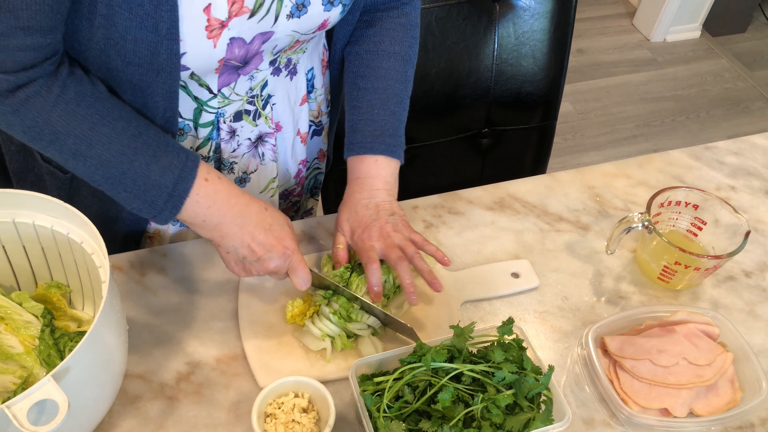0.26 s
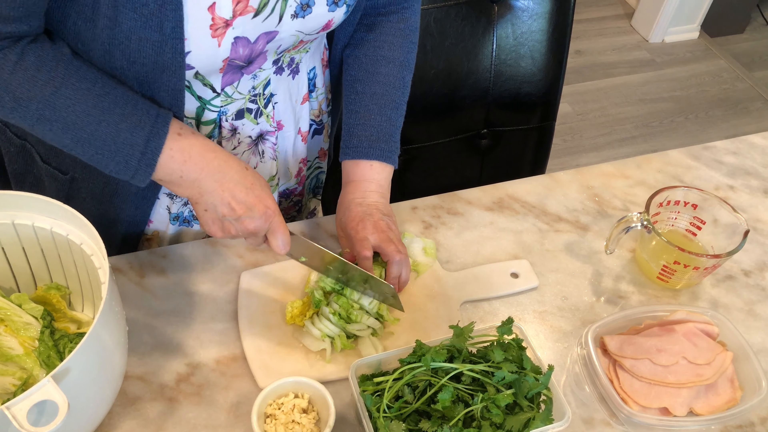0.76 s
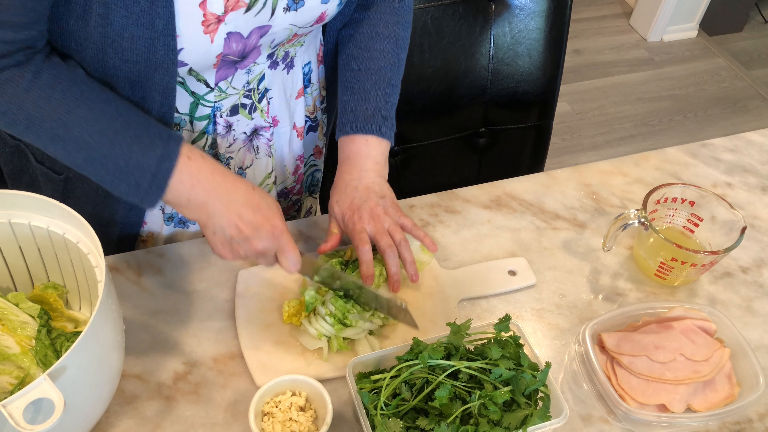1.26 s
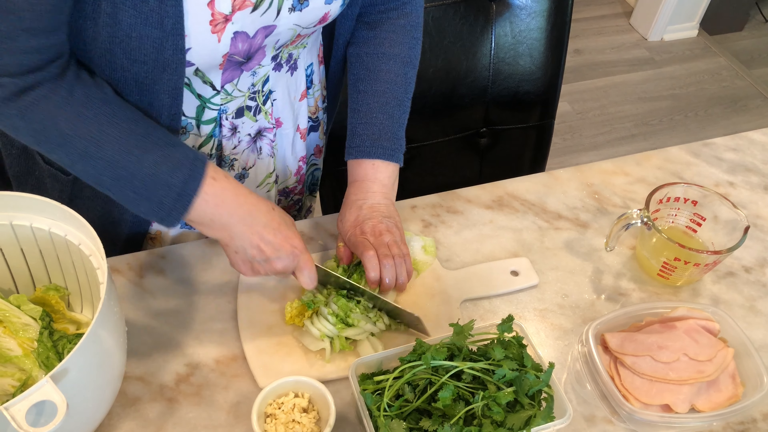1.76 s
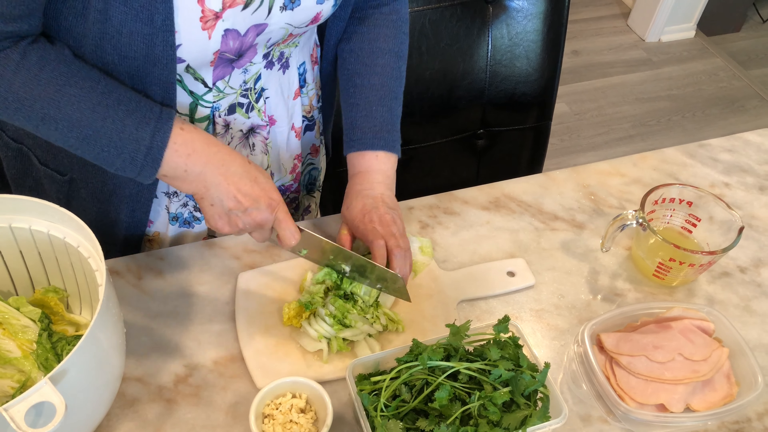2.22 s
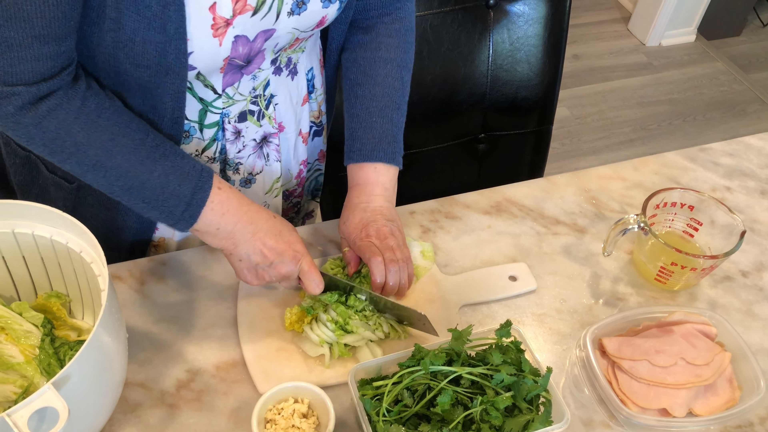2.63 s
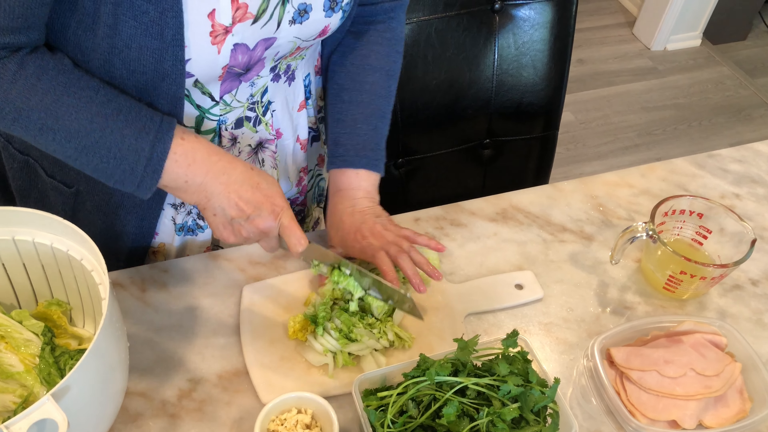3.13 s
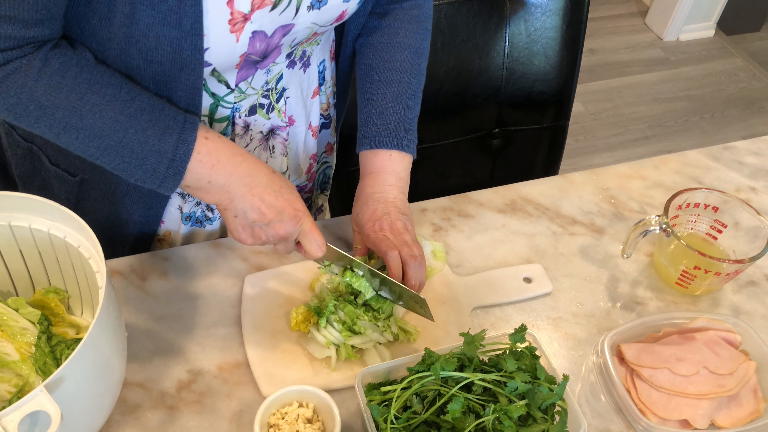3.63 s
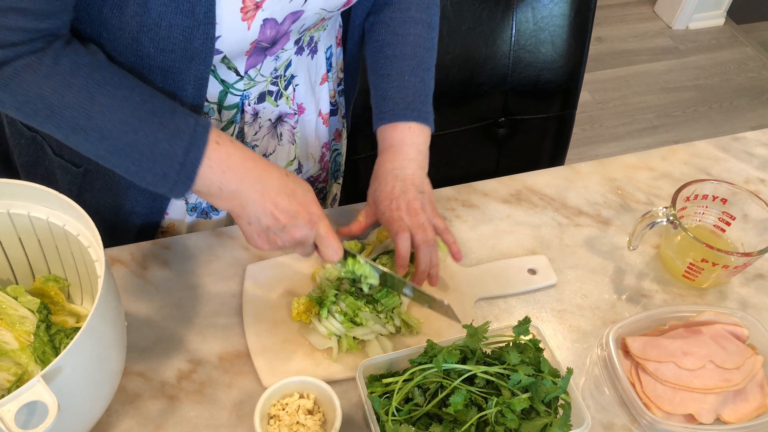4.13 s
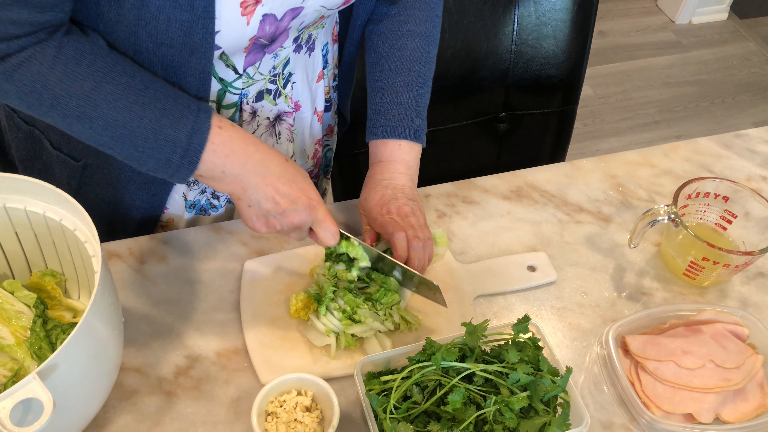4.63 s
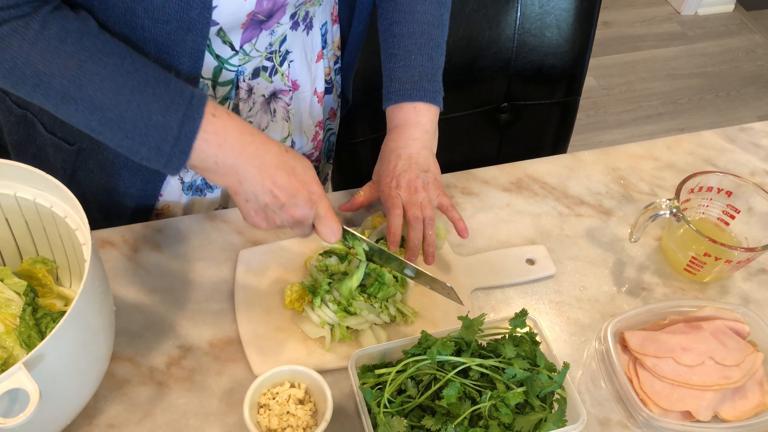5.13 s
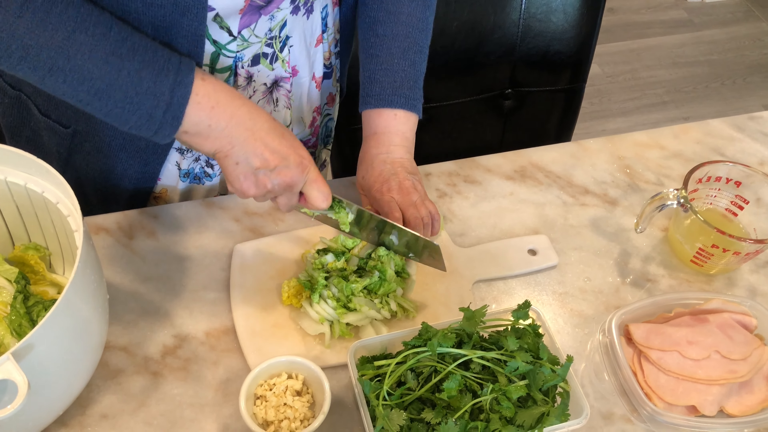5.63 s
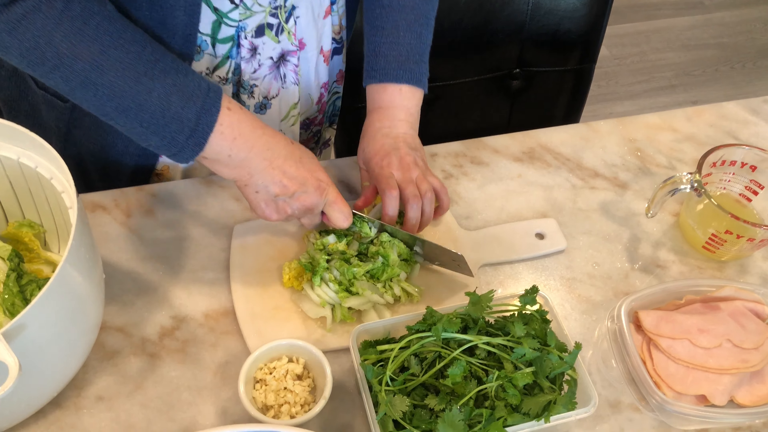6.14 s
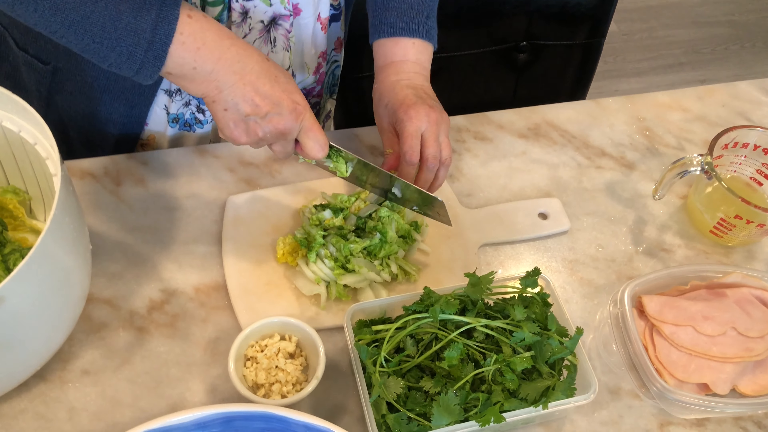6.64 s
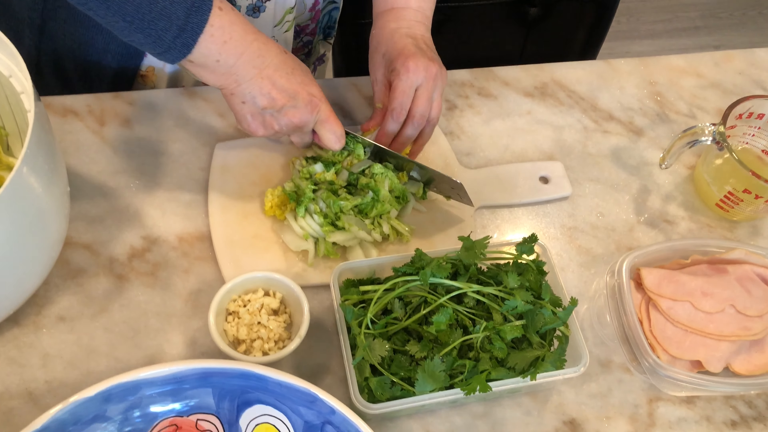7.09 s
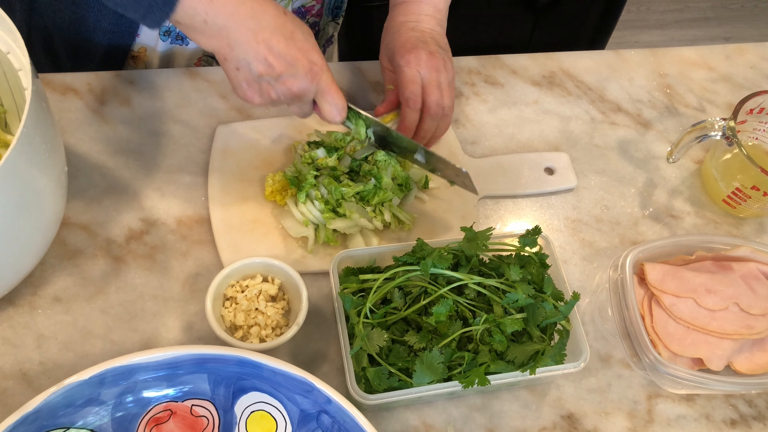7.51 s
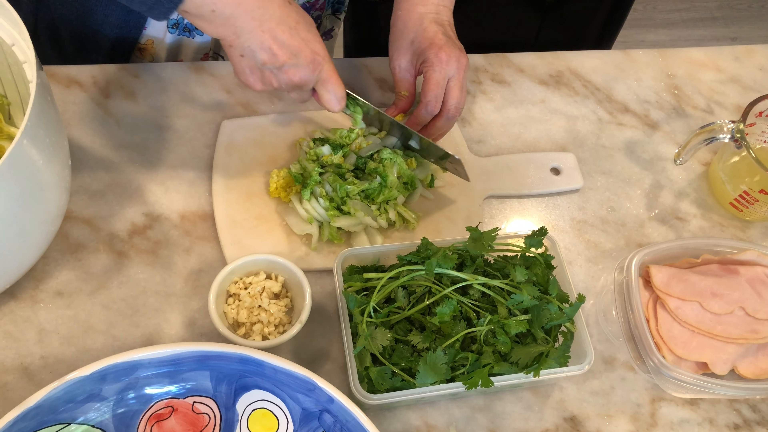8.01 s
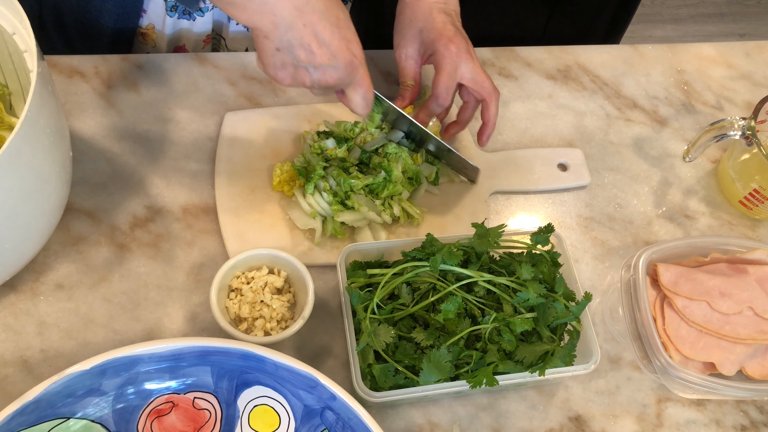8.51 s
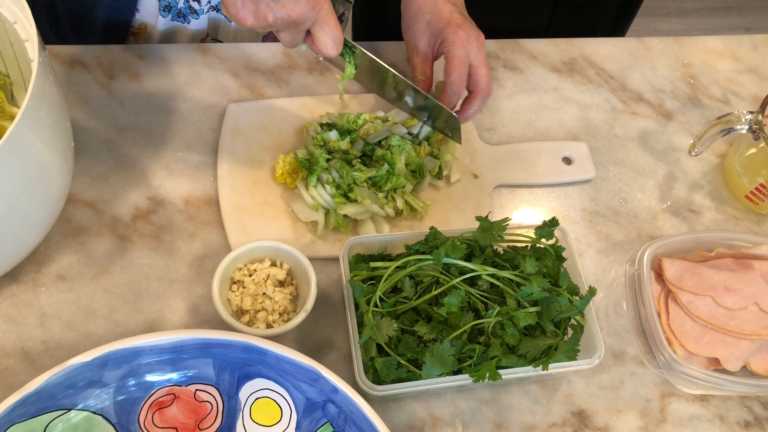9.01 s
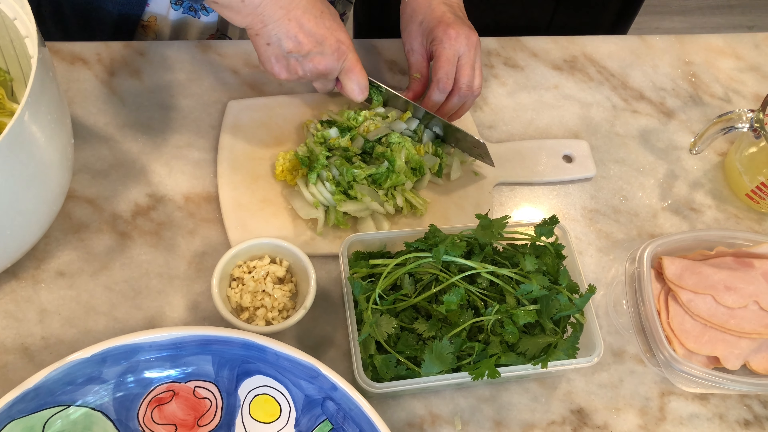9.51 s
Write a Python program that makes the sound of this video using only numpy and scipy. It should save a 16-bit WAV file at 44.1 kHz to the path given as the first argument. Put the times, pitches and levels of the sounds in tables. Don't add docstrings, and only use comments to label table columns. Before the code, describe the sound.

Slow, separate cabbage cuts crackle and snap, then thud on a board over stone, with soft leaf rustles between strokes in a quiet kitchen.

```python
import sys
import numpy as np
from scipy import signal
from scipy.fft import rfft, irfft, next_fast_len
from scipy.io import wavfile

SR = 44100
rng = np.random.default_rng(int(sys.argv[2]) if len(sys.argv) > 2 else 0)


def to_linear_factor(level_db):
    exponent = np.asarray(level_db, float) / 20
    return 10 ** exponent


def generate_wav(signal):
    frames = np.transpose(np.atleast_2d(signal))
    scaled = np.clip(frames, -1, 1) * 32767
    pcm = np.round(scaled).astype(np.int16)
    wavfile.write(sys.argv[1], SR, pcm)


N = 429975

# start_s, peak_db, boom_db, brightness_db, contact_s
KNOCKS = [(0.192, -43.5, -30.5, -2, 0.013), (0.416, -23, -9.5, -3, 0.015), (1.338, -9.5, -18, 4, 0.0024),
          (2.164, -35.5, -33, 2, 0.013), (2.88, -20.5, -32.5, -7, 0.0065), (4.206, -30, -19.5, 1.5, 0.0089),
          (4.224, -39, -35, -2.5, 0.003), (5.152, -19, -12.5, -1.5, 0.0083),
          (6.333, -23.5, -45, -13, 0.011), (7.363, -26, -38, -5, 0.017), (8.494, -36, -36.5, 1.5, 0.015),
          (8.527, -30, -35.5, -2.5, 0.015), (9.727, -43, -30, 7, 0.007)]
# bite_s, through_s, tearing_db, push_db, counter_murmur_db
CUTS = [(0.129, 0.2, -64, -62, -45.5), (.3, .35, -60, -32, -36.5), (.348, 0.438, -48.5, -24, -35),
        (1.2, 1.354, -53, -39.5, -53.5), (1.338, 1.37, -41.5, -33, -39.5), (2.014, 2.178, -51, -36.5, -47),
        (2.779, 2.887, -47.5, -34, -41), (4.1, 4.217, -46, -29.5, -34.5), (5.013, 5.148, -47.5, -27, -36),
        (6.231, 6.351, -47, -35.5, -37.5), (7.205, 7.385, -49, -35, -40), (8.308, 8.45, -55, -41, -42),
        (8.47, 8.55, -47.5, -35.5, -37.5), (9.506, 9.76, -57, -50, -42)]
# start_s, end_s, tearing_db, push_db, counter_murmur_db
SHIFTS = [(0.753, 0.825, -77.5, -76, -70), (2.58, 2.735, -80.5, -62, -52), (3.288, 3.4, -82.5, -68, -51.5),
          (3.755, 3.865, -70, -64.5, -45.5), (4.93, 5, -76, -68, -55.5), (5.677, 5.858, -73, -76.5, -51),
          (6.072, 6.124, -73.5, -72, -68), (6.941, 7.17, -74, -80, -49), (7.848, 8.272, -72.5, -82, -52.5),
          (8.679, 8.78, -74, -72, -49), (8.865, 9.032, -71.5, -49.5, -47), (3.91, 3.99, -72, -72, -51),
          (0, 0.08, -98, -70, -51.5), (1.01, 1.15, -88, -59, -58), (9.16, 9.228, -74.5, -69, -50.5)]


def rms_one(x):
    return x / np.sqrt(np.mean(x ** 2) + 1e-20)


def at_hz(points, hz):
    knots_hz, values = np.array(points)[:, 0], np.array(points)[:, 1]
    return np.interp(np.log(np.maximum(hz, 1)), np.log(knots_hz), values)


def coloured(x, points):
    size = next_fast_len(N + 4096)
    response = to_linear_factor(at_hz(points, np.fft.rfftfreq(size, 1 / SR)))
    return irfft(rfft(x, size) * response, size)[..., :N]


def passed(x, hz, kind, order=4):
    return signal.sosfilt(signal.butter(order, hz, kind, fs=SR, output="sos"), x)


def drift(rate):
    r = np.exp(-80 * np.pi * rate / SR)
    slow = signal.lfilter([1], [1, -2 * r, r * r], rng.standard_normal(N // 40 + 2002))[2000:]
    return np.interp(np.arange(N) / 40, np.arange(len(slow)), rms_one(slow))


def ring(force, hz, t60):
    r, w = to_linear_factor(-60 / (t60 * SR)), 2 * np.pi * hz / SR
    return signal.lfilter([0, np.sin(w)], [1, -2 * r * np.cos(w), r * r], force + 1e-18)


def grains(per_s, spread_db):
    sizes = to_linear_factor(spread_db * np.minimum(rng.exponential(1, (2, N)), 5)) * rng.choice([-1, 1], (2, N))
    return sizes * (rng.random(N) < per_s / SR) + 0.28 * rng.standard_normal((2, N))


def effort(level, rest_db, climb_db, release_db_per_s, more_db=0.0, settle_db=25.0, lag_s=0.0, hold_s=0.0,
           approach=1.0, moves=CUTS + SHIFTS):
    bite_db, approach_db_per_s, settle_db_per_s = 8.5, 162.5, 63
    shift_climb = 0.33
    t, rows = np.arange(0, N / SR, .002), np.array(moves)
    bite = rows[:, :1] + lag_s
    through = rows[:, 1:2] + hold_s
    top = rows[:, level:level + 1] + more_db
    climb_db = climb_db * np.array([[shift_climb if move in SHIFTS else 1] for move in moves])
    before = top - climb_db - bite_db - approach * approach_db_per_s * (bite - t)
    during = top - climb_db * (through - t) / (through - bite)
    since = t - through
    after = top - np.minimum(release_db_per_s * since, settle_db + settle_db_per_s * since)
    shape = np.where(t < bite, before, np.where(t < through, during, after))
    total = 10 * np.log10(to_linear_factor(rest_db) ** 2 + np.sum(to_linear_factor(shape) ** 2, axis=0))
    return np.interp(np.arange(N) / SR, t, total)


def counter_modes(force):
    # mode_hz, width_hz, level_db
    slab = [(122, 25, -47.5), (163.5, 3, 3.5), (172.8, 14, 21), (202, 13, -7)]
    modes = 0
    for hz, width_hz, level_db in slab:
        t60_s = np.log(1000) / np.pi / width_hz
        modes = modes + to_linear_factor(level_db) * width_hz ** .5 * ring(force, hz, t60_s)
    mid, side = passed(modes, [112, 260], "band", order=3)
    side = .5 * side - .86 * mid
    return np.array([mid, to_linear_factor(-0.5) * side])


def hum():
    # freq_hz, level_db
    air_colour = [(140, -34), (230, 8), (483, -9.5), (566, -27.5), (737, -16), (1070, -32.5), (1340, -24),
                  (3190, -36), (3610, -49), (5710, -41.5), (6930, -50), (11200, -52.5), (12600, -52.5),
                  (15600, -68)]
    breathing_db = 1.5 * drift(3)
    air = to_linear_factor(-60.5 + 1.7 + breathing_db) * rms_one(coloured(rng.standard_normal((2, N)), air_colour))
    murmur = to_linear_factor(-60) * rms_one(counter_modes(rng.standard_normal((2, N))))
    rumble = to_linear_factor(-68.5) * rms_one(passed(rng.standard_normal((2, N)), [25, 62], "band", order=2))
    rumble = rumble * to_linear_factor(2.5 * drift(1.5))
    hiss = to_linear_factor(-99) * rms_one(passed(rng.standard_normal((2, N)), [11600, 14600], "band"))
    mains = np.sin(2 * np.pi * 59 * np.arange(N) / SR) * to_linear_factor(3 * drift(2.5))
    return air + murmur + rumble + to_linear_factor(-73.5) * mains + hiss


def pressing():
    # freq_hz, density_db_per_hz
    thud_colour = [(200, -21.5), (260, 8.5), (360, 8), (520, 1), (690, -1), (860, 0.5), (1100, -49.5)]
    # start_s, end_s, level_db
    rub = [
        (8.89, 9.03, -44),
        (8.55, 8.62, -50),
        (8.7, 8.77, -57),
    ]
    tearing, push, counter = 2, 3, 4
    push_db = effort(push, rest_db=-83.5, climb_db=7, approach=2.1, release_db_per_s=260, settle_db=43.0,
                     lag_s=.04)
    boom_db = effort(counter, rest_db=-61, climb_db=5.5, release_db_per_s=256, settle_db=16.5)
    cut_db = effort(tearing, rest_db=-66.5, climb_db=17.5, release_db_per_s=144.5, more_db=6.0)
    shift_db = effort(counter, rest_db=-68.5, climb_db=6.5, release_db_per_s=112.5, more_db=-11.5, moves=SHIFTS)
    rub_db = effort(tearing, rest_db=-91, climb_db=-1.5, release_db_per_s=198, moves=rub)
    thud_db = np.maximum(np.maximum(cut_db, shift_db), rub_db)

    shudder = passed(passed(rng.standard_normal((2, N)), 190, "low"), 42, "high", order=1)
    shudder = rms_one(shudder) + .5 * rms_one(passed(shudder, [105, 150], "band", order=2))
    murmur = counter_modes(grains(per_s=76, spread_db=4.5))
    rubbing = grains(per_s=1200, spread_db=4.5)
    thud = rms_one(coloured(rubbing, thud_colour))
    thud = thud + np.clip((thud_db + 56) / 24, 0, .45) * rms_one(ring(rubbing, 689, .1))
    return (to_linear_factor(np.minimum(push_db, -22)) * rms_one(shudder)
            + to_linear_factor(np.minimum(boom_db, -37) + 0.24) * rms_one(murmur)
            + to_linear_factor(np.minimum(thud_db, -40) - 3.0) * rms_one(thud))


def leaves():
    # freq_hz, density_db_per_hz
    creak_colour = [(700, -12.5), (900, 0), (1250, 0.5), (1800, 1), (2200, -13), (2800, -42)]
    # freq_hz, density_db_per_hz
    crackle_colour = [(1500, -22.5), (2100, 1.5), (3300, 0), (3900, -4.5), (6200, -8), (6900, -17.5),
                      (8500, -23.5), (11000, -32), (11700, -24), (13000, -18), (15000, -24), (15700, -28.5)]
    tearing = 2
    creak_db = effort(tearing, rest_db=-77, climb_db=18, release_db_per_s=167, more_db=4.0, settle_db=15.0)
    crackle_db = effort(tearing, rest_db=-78.5, climb_db=8, release_db_per_s=165, settle_db=14.5, hold_s=0.019)
    creak = coloured(grains(per_s=920, spread_db=0.5), creak_colour)
    crackle = rms_one(coloured(grains(per_s=5000, spread_db=1.5), crackle_colour))
    creak_db = np.minimum(creak_db, -41) + 1.4 * drift(26)
    crackle_db = np.minimum(crackle_db, -39) + 1.4 * drift(40)
    treble = passed(crackle, 4500, "high", order=2)
    crackle = passed(crackle, 3300, "low", order=2) - to_linear_factor(0.14 * (crackle_db + 38.5)) * treble
    return to_linear_factor(creak_db + 0.18) * rms_one(creak) + to_linear_factor(crackle_db + 0.33) * crackle


def snaps():
    # start_s, peak_db
    ribs = [(0.174, -33), (0.3034, -27.5), (0.3476, -20), (0.3785, -16), (1.271, -26.5), (1.9964, -35),
            (2.0439, -42), (2.0827, -31), (2.134, -39), (2.7651, -34), (2.7912, -36), (2.8085, -28),
            (2.862, -31.5), (4.0794, -36.5), (4.1, -25), (4.1488, -19), (5.005, -31), (5.0469, -20),
            (5.1134, -16.5), (6.2227, -32), (6.2627, -31), (7.2025, -35), (7.281, -44.5), (8.3166, -28),
            (8.3387, -21.5), (9.507, -41), (9.5326, -41), (9.6011, -32.5), (9.6365, -30), (9.674, -25)]
    # start_s, peak_db
    ticks = [(0.1362, -37.5), (1.243, -44), (1.8807, -52), (3.757, -45), (3.818, -49), (4.978, -39),
             (5.7194, -58), (5.8394, -48.5), (6.081, -37), (7.1362, -33), (7.8694, -39.5), (8.229, -49),
             (8.7004, -29.5), (9.081, -36.5), (9.2194, -58.5)]
    # freq_hz, density_db_per_hz
    snap_colour = [(700, -30), (1000, 0), (3000, -9.5), (6200, -17.5), (7200, -23), (11000, -34.5),
                   (11700, -25), (15600, -37)]
    events, size = ribs + ticks, 3000
    out, fray = np.zeros((2, N + size)), np.exp(-np.arange(size) / SR / .008)
    for (s, peak_db), draw in zip(events, rng.standard_normal((len(events), 2, size))):
        i = round(s * SR)
        out[:, i:i + size] += to_linear_factor(peak_db - 10.0) * draw * fray
    return coloured(out[:, :N], snap_colour)


def kitchen(x):
    # freq_hz, t60_s
    decay = [(100, 0.41), (700, 0.26), (4000, 0.28), (14000, 0.033)]
    t, tail = np.arange(SR // 2) / SR, 0
    white = rng.standard_normal((2, SR // 2))
    for low, high in [(150, 400), (400, 1500), (1500, 6000), (6000, 11000), (11000, 16000)]:
        t60_s = at_hz(decay, np.sqrt(low * high))
        tail = tail + passed(white, [low, high], "band", order=2) * to_linear_factor(-60 * t / t60_s)
    tail = tail * np.clip(t / 0.0044 - .3, 0, 1) / np.sqrt(np.sum(tail ** 2) / 2)
    return signal.fftconvolve(x, tail, axes=1)[:, :N]


def knocks():
    # start_s, peak_db, boom_db, brightness_db, contact_s
    graze = [
        (1.318, -30.5, -44.5, -1.5, 0.016),
        (1.347, -16.5, -40.5, -2.4, 0.013),
    ]
    # start_s, peak_db, boom_db, brightness_db, contact_s
    bumps = [(8.891, -38.5, -23.5, -40, 0.0087), (8.927, -34, -17, -19, 0.024),
             (9.004, -68, -25.5, -38, 0.013), (9.055, -65, -39, -40, .006), (8.735, -56, -37, -40, 0.023),
             (8.801, -69, -59, -38, .006), (9.52, -68, -34, -40, 0.023), (9.555, -73, -28.5, -38, .03),
             (9.597, -69, -51, -40, .006), (9.627, -69, -32.5, -40, 0.0089), (9.665, -66, -41, -40, 0.014)]
    # mode_hz, level_db, t60_s
    board_modes = [(297, -13, 0.037), (360, -6, 0.051), (574, -0.5, 0.025), (696.5, 6, 0.043),
                   (1000, -8, .03), (1285, -7.5, 0.043), (1664, -11.5, 0.029), (2550, -20, .03),
                   (3860, -21, 0.021)]
    # freq_hz, density_db_per_hz
    crack_colour = [(150, -27.5), (300, -1), (700, 6), (1300, 9), (3500, -4.5), (6200, -18.5), (7000, -23),
                    (11000, -34.5), (11700, -26.5), (13000, -27.5), (15600, -31)]
    force, boom = np.zeros((2, N)), np.zeros((2, N))
    blows = KNOCKS + graze + bumps
    chance, t = rng.standard_normal((len(blows), 2, 4000)), np.arange(20000) / SR
    tone = np.sin(2 * np.pi * 179 * t) + 0.083 * np.sin(2 * np.pi * 218 * t)
    tone = tone + 0.26 * np.sin(2 * np.pi * 150 * t) - 0.11 * np.sin(2 * np.pi * 165 * t)
    for blow, draw in sorted(zip(blows, chance), key=lambda pair: pair[0][0]):
        s, peak_db, boom_db, bright_db, contact = blow
        i, contact = round(s * SR), np.clip(contact, .001, .03)
        burst = draw * np.exp(-t[:4000] / contact) * (1 - np.exp(-t[:4000] / 0.0027))
        deep = rms_one(passed(burst, [250, 500], "band", order=2))
        middle = rms_one(passed(burst, [500, 900], "band", order=2))
        bright = rms_one(passed(burst, 730, "high"))
        burst = 0.13 * deep + 0.12 * middle + to_linear_factor(bright_db) * bright
        burst = burst * np.sqrt(contact * SR / 8000)
        end = min(N - i, 4000)
        force[:, i:i + end] += to_linear_factor(peak_db + 2.5) * burst[:, :end]
        end = min(N - i, len(t))
        if blow in bumps:
            boom[:, i:i + end] *= np.exp(-t[:end] / 0.006)
        swell = to_linear_factor(-60 * t / 0.29) * (1 - np.exp(-t / contact / 1.3))
        boom[:, i:i + end] += to_linear_factor(boom_db + 4.0) * (swell * tone)[:end] * [[1], [-1.1]]
    board = sum(to_linear_factor(level_db - 28.0) * ring(force, hz, t60) for hz, level_db, t60 in board_modes)
    return board + coloured(force, crack_colour), boom


def rattle():
    landings = [(s, s + 0.02, peak_db) for s, peak_db, *_ in KNOCKS]
    buzz_db = effort(level=2, rest_db=-99, climb_db=17, release_db_per_s=188, more_db=-21.5, settle_db=29.0,
                     moves=landings)
    buzz = passed(grains(per_s=2500, spread_db=2.0), [520, 930], "band", order=2)
    return to_linear_factor(buzz_db) * rms_one(buzz)


def scene():
    # freq_hz, level_db
    side_colour = [(30, 8.5), (110, 4.5), (200, 6.5), (400, 3), (1300, 9), (2400, -1.5), (4400, -13.5),
                   (6000, -0.5), (16000, 1)]
    knock, boom = knocks()
    sharp = knock + snaps()
    mid, side = leaves() + pressing() + rattle() + sharp + to_linear_factor(-5.5) * kitchen(sharp) + boom + hum()
    side = coloured(side, side_colour)
    return np.array([mid + side, mid - side])


def width(spells, narrow_db, open_s, close_db_per_s):
    t = np.arange(0, N / SR, .005)
    out = narrow_db + 0 * t
    for opens, closes, top_db in spells:
        rise = top_db + (narrow_db - top_db) * np.exp(-np.maximum(t - opens, 0) / open_s)
        out = np.maximum(out, rise - close_db_per_s * np.maximum(t - closes, 0))
    return np.interp(np.arange(N) / SR, t, out)


def roll_off(x):
    return signal.sosfilt(signal.butter(12, 15750, fs=SR, output="sos"), x)


def record(dry):
    # opens_s, lows_close_s, highs_close_s, highs_db
    wide_spells = [
        (-1.5, .6, 0.53, 9.5),
        (4, 5.23, 5.16, 11),
        (8.5, 11.0, 11.0, 17.5),
    ]
    # freq_hz, level_db
    sheen = [(4600, -45.5), (5800, -9.5), (8000, 6), (10900, 2.5), (11900, -18.5)]
    # freq_hz, level_db
    top_only = [(10800, -60), (11400, 0)]
    mid, side = (dry[0] + dry[1]) / 2, (dry[0] - dry[1]) / 2
    low_spells = [(opens, closes, -3.5) for opens, closes, _, _ in wide_spells]
    high_spells = [(opens, closes, top_db) for opens, _, closes, top_db in wide_spells]
    lows_db = width(low_spells, narrow_db=-66, open_s=0.093, close_db_per_s=37.5)
    highs_db = width(high_spells, narrow_db=-27, open_s=0.66, close_db_per_s=97)
    wide = np.clip(1.6 * to_linear_factor(lows_db), 0, 1)
    mid = mid + to_linear_factor(highs_db) * coloured(mid, sheen)
    mid = mid - wide * (0.3 * passed(mid, [250, 480], "band", order=2) + 2.6 * passed(mid, 82, "low", order=1))
    moved = passed(mid, [500, 2400], "band", order=1)
    mid = mid - 0.17 * wide * moved
    lows = passed(side, 4800, "low") - .4 * moved
    highs = passed(side + coloured(side, sheen), [4800, 11200], "band") + .15 * coloured(mid, sheen)
    top = coloured(side + .4 * mid, top_only)
    side = to_linear_factor(lows_db) * lows + to_linear_factor(highs_db) * highs + top
    top_cut = signal.cheby2(12, 60, 15900, fs=SR, output="sos")
    mix = signal.sosfilt(top_cut, np.array([mid + side, mid - side]))
    return roll_off(mix)


dry = scene()
out = record(dry)
generate_wav(out)
```